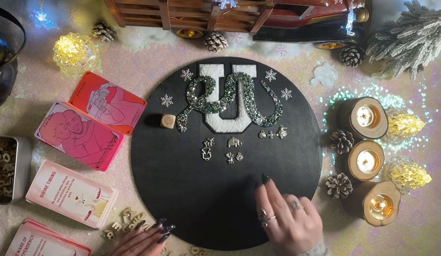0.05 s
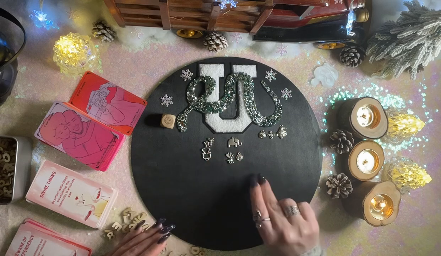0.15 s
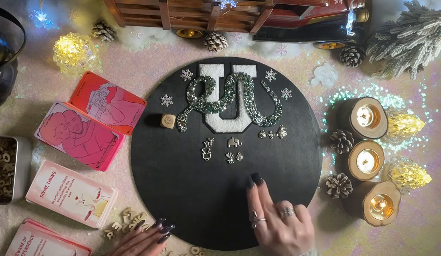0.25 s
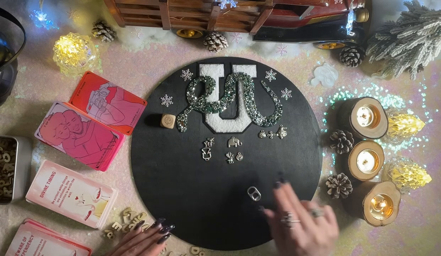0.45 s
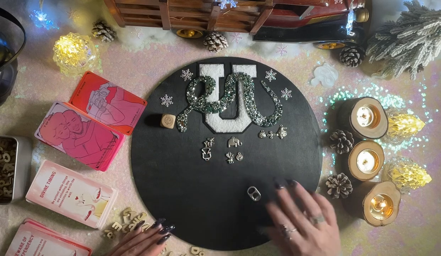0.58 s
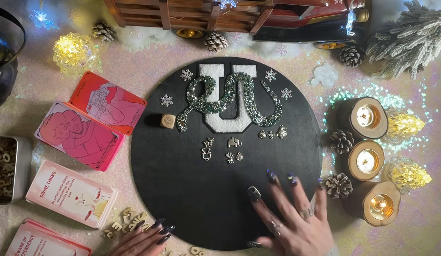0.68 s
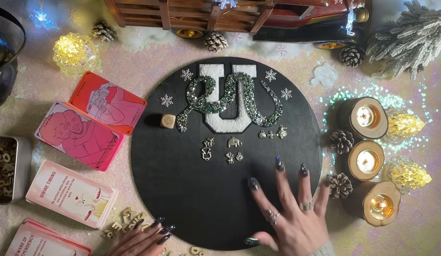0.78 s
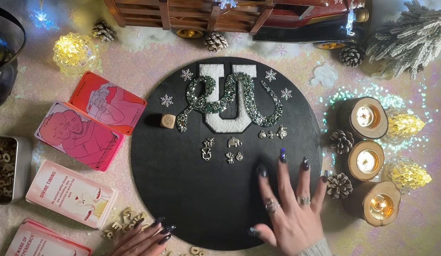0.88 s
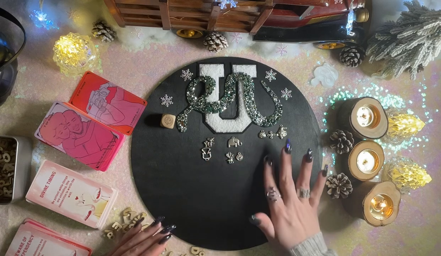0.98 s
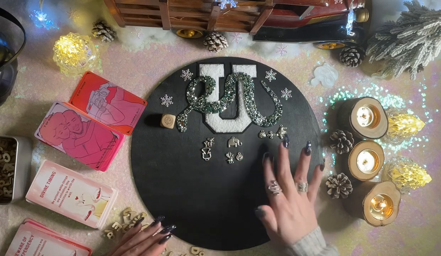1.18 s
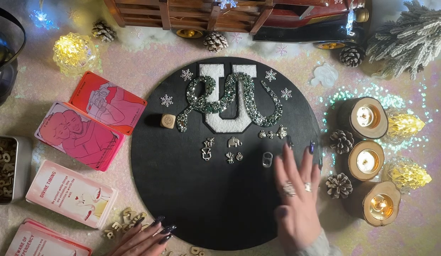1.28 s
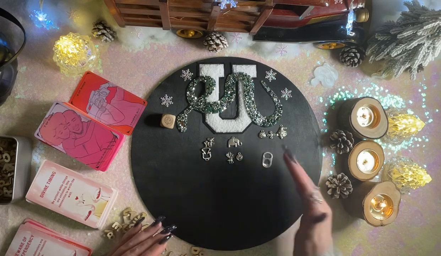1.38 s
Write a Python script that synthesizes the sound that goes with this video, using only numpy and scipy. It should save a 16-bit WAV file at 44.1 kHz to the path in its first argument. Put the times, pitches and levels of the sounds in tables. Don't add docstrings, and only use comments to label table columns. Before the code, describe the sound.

A small metal pull tab handled on a thin board, heard close in a small room. Faint low hum and hiss until about 0.2 s, then two sharp clacks, a harder slam at 0.31 and quickening bounces to 0.46. Near quiet follows, with a soft swell of rumble around 0.55. From 0.74 to 1.1 a gritty, stuttering finger drag, fading; at 1.21-1.31 a last click and small ticks.

```python
import sys
import numpy as np
from scipy import signal
from scipy.fft import rfft, irfft
from scipy.io import wavfile
from scipy.ndimage import uniform_filter1d

SR = 44100
rng = np.random.default_rng(int(sys.argv[2]) if len(sys.argv) > 2 else 0)


def linear_from_db(decibels):
    return 10 ** (np.asarray(decibels, float) / 20)


def pcm_store(signal):
    levels = np.round(np.clip(np.atleast_2d(signal), -1, 1) * 32767)
    wavfile.write(sys.argv[1], SR, levels.astype(np.int16).T)


N = 63945

# (frequency [Hz], density [dB])
RUMBLE_SPECTRUM = [(30, -48), (60, -15), (160, -9), (200, -13.5), (300, -17.5), (400, -26), (520, -65),
                   (800, -81)]
HISS_SPECTRUM = [(300, -1), (500, 0), (900, -4), (2500, -9), (4000, -12.5), (7500, -16), (9500, -27),
                 (13000, -18), (15500, -16.5)]
# (time [s], frequency [Hz], level [dB])
HUM = [(0.0, 260.7, -62), (0.08, 262.3, -67), (0.27, 262.7, -60.5), (1.296, 250.1, -57.5),
       (1.45, 259.8, -62.5)]
# (frequency [Hz], width [Hz], level [dB])
DRONES = [(60, 18, -66), (101.7, 20, -64), (112.7, 17.3, -58.5), (156.3, 12.5, -60.5)]
# (time [s], level [dB])
SWELL = [(0, -2.5), (.28, -1), (.4, -1), (.55, 5), (.7, -1.5), (.9, -6), (1.1, -3), (1.3, -2), (1.45, -1)]

# (frequency [Hz], gain [dB], t60 [s])
BOARD = [(657, -1, 0.021), (800, 5, 0.014), (1057, 16.5, 0.0053), (1240, 3, 0.008), (1563, 12, 0.0075),
         (1600, 6, 0.0036)]
EDGE = [(1910, 10, 0.0031), (2294, 2, 0.0045), (2534, 3.5, 0.0046), (2950, -4.5, 0.0064), (3360, 6, 0.0038),
        (3710, -2, 0.015), (4330, 1.5, 0.0061), (5200, -1.5, 0.0011)]
TAB = [(5710, -2, 0.0064), (5980, -5.5, 0.0045), (6650, -3.5, .005), (7280, -1.5, .004), (8610, -4.5, .003)]
# (frequency [Hz], gain [dB], t60 [s])
TICK = [(10240, -1, 0.001), (11520, -3, .002), (12550, -3.5, 0.0024), (15100, -13, .002)]
# (frequency [Hz], gain [dB], t60 [s])
HELD_BOARD = [(634, 2, 0.0075), (848, -3, 0.021), (1037.7, -1.5, 0.024), (1265, 0, 0.016),
              (1605, -1.5, 0.007)]
HELD_EDGE = [(1860, -3.5, 0.0044), (2209, 6.5, 0.0074), (2926, -1.5, 0.012), (3450, -3, .007),
             (4120, -5, 0.011)]
HELD_TAB = [(4490, -7.5, 0.004), (6250, -5, .006), (7710, 1, 0.0043), (8490, -0.5, 0.0074)]

# (time [s], level [dB], edge share [dB], tab share [dB])
RATTLE = [(.214, -50, -21, -7), (.3, -58, -3.5, -17), (.33, -71, -6, 7), (.46, -55.5, -1, -5),
          (.5, -69.5, -27, -1), (.58, -89, -13, -26)]
SKID = [(0.736, -49, 2, -30), (0.789, -45.5, -12, -29), (0.861, -69, 11.5, -1)]
BRUSH = [(.645, -96, -1, -3), (.675, -102, -5.5, 7), (.7, -80, -3, 2), (.73, -93, 13, 5)]
DRAG = [(0.729, -59, 1, -15), (0.741, -45.5, -16, -12), (.8, -48, -28, -14), (.85, -43.5, -20.5, -16.5),
        (0.888, -38, -9.5, -18.5), (.96, -46, -7, -15.5), (1.03, -53.5, 0, -13), (1.1, -52.5, -5.5, -21.5),
        (1.2, -62, -11, -18)]
LIFT = [(1.201, -54, -16, -26), (1.235, -63, 3, -26), (1.277, -59.5, 8.5, -18), (1.329, -62.5, -28, -20),
        (1.37, -71, -34.5, -22), (1.45, -68, -20, -43)]

# (time [s], peak [dB], board frequency [Hz], edge gain [dB], edge frequency [Hz])
SLIPS = [(0.815, -30, 1130, -13, 3360), (0.824, -32, 690, -3.5, 3400), (0.844, -32, 773, -18, 1870),
         (0.858, -31, 1130, -22, 1890), (0.867, -31, 1240, -18, 1810), (0.881, -27, 1180, -24, 2100),
         (0.887, -27.5, 860, -23, 1990), (0.893, -25.5, 900, -16, 2290), (0.904, -24, 1220, -4, 2260),
         (0.931, -29, 945, -16, 1990), (0.944, -34, 855, -13, 2200), (0.963, -29.5, 1050, -13, 2310),
         (0.968, -25, 1270, -3, 2210), (0.989, -31, 1390, -14, 2090), (1.019, -38, 1000, -9, 2170),
         (1.051, -44, 840, -20, 2110), (1.064, -37, 1320, -12, 2210), (1.236, -43, 1180, -8, 2160),
         (1.246, -31.5, 1080, -11, 2160), (1.267, -37, 1260, -12, 2220), (1.28, -38, 1300, -17, 2260)]
SQUEAKS = [(.257, -30.5, 1300, 4, 2020), (0.81, -39, 1200, -3, 2900), (0.79, -24, 1070, 2, 2330),
           (0.91, -42, 1100, 3, 2200), (1.275, -37, 940, 6, 2450)]

# (time [s], peak [dB])
BLOWS = [
    (0.2146, -20),
    (0.2279, -17.5),
    (0.3146, -14),
    (1.2165, -22),
]
# (time [s], peak [dB])
BOUNCES = [(.3448, -26), (.3735, -20.5), (.4105, -23)]
# (frequency [Hz], gain [dB], t60 [s])
FIRST_SPOT = [(720, -1, 0.0074), (1082, 3, 0.011), (1490, -2.5, 0.0046), (2300, 0, 0.0056),
              (4300, -17, .005)]
SECOND_SPOT = [(1004, -4.5, 0.01), (1620, -2, 0.0073), (2390, -5, .005), (3570, -0.5, .007),
               (4370, -7, .006), (5490, 3, .011), (6940, -1.5, .008)]
SLAM_SPOT = [(634, -3, 0.0088), (790, 0.5, 0.014), (1116, 0, 0.0083), (1640, -2, 0.015), (1990, -1, 0.0082),
             (2420, -1, 0.0057), (2780, -5.5, 0.0098), (3310, -2.5, .007), (3760, -1, .007),
             (4500, 4, .007)]
LAST_SPOT = [(1000, 1.5, 0.0068), (1270, 1, 0.01), (1880, -23, .005), (3080, 0.5, .006), (7460, 1.5, .005),
             (8250, 4.5, .005)]

# (time [s], peak [dB], board share [dB], edge share [dB], tab share [dB])
DROPS = [(0.214, -14.5, -24, -18, -33), (0.227, -17, -28, -17, -14), (0.253, -20.5, -16, -17.5, -24.5),
         (0.314, -10, -49, -23.5, -18.5), (0.3445, -28.5, -25, -24, -9.5), (0.359, -29.5, -8, -8.5, -12),
         (0.373, -18, -16.5, -15, -19.5), (0.41, -25, -13, -8.5, -10), (0.426, -35, -19, -4.5, -6.5),
         (0.436, -25.5, -13.5, -7, -9.5), (0.442, -30, -5.5, -10, -21), (0.452, -30, -8, -13, -9.5),
         (0.463, -34.5, -8, -7.5, -12)]
CATCHES = [(0.576, -58, -4, -10, -25), (0.613, -52, 0, -15.5, -30.5), (0.655, -55, -10, -17, -6.5),
           (0.67, -57, -36, -38, -1), (0.737, -27, -13.5, -17.5, -10.5), (0.923, -26.5, -7, -11, -33),
           (0.968, -23.5, -11.5, -11.5, -30), (1.007, -29.5, -5, -10, -29), (1.088, -37, -4, -6, -54),
           (1.212, -28.5, -13.5, -7, -33), (1.243, -33, -13, -6.5, -12.5), (1.25, -25.5, -8, -9, -15),
           (1.2615, -37.5, -14, -9, -6), (1.275, -29.5, -10, -11, -15.5), (1.3, -34, -11.5, -11, -16.5),
           (1.309, -39.5, -7, -7.5, -13.5)]
MORE_CATCH_S = [.3712, .9118, .9487, 1.134, 1.1853, 1.2155, 1.2215]
# (peak [dB], board share [dB], edge share [dB], tab share [dB])
MORE_CATCHES = [(-24.5, -13, -7, -11), (-27, -4, -9.5, -33), (-34, -10, -7.5, -28), (-60.5, -20, -9, 0.5),
                (-41, -28, -0.5, -18.5), (-21, -23.5, -25, -15), (-36.5, -13, -12, -4.5)]
CHATTER_DB = [-24, -10.5, 7, -7]


def unit(x):
    return x / np.sqrt(np.mean(x ** 2) + 1e-30)


def walk(rate_hz):
    hold = max(int(SR / rate_hz), 2)
    steps = np.repeat(rng.standard_normal(N // hold + 1), hold)
    return 0.8 * uniform_filter1d(uniform_filter1d(steps, hold), hold)[:N]


def high_pass(x, order, cut_hz):
    return signal.sosfilt(signal.butter(order, cut_hz, "high", fs=SR, output="sos"), x)


def coloured(spectrum):
    hz = np.maximum(np.fft.rfftfreq(N, 1 / SR), 1)
    point_hz, point_db = np.array(spectrum).T
    gain = linear_from_db(np.interp(np.log(hz), np.log(point_hz), point_db))
    return unit(irfft(rfft(rng.standard_normal(N)) * gain, N))


def hum():
    t = np.arange(N) / SR
    time_s, hz, db = np.array(HUM).T
    phase = 2 * np.pi * np.cumsum(np.interp(t, time_s, hz)) / SR
    level_db = np.interp(t, time_s, db) + 2.0 * walk(8.46)
    return np.sqrt(2) * linear_from_db(level_db) * np.sin(phase)


def drone(hz, width_hz):
    b, a = signal.iirpeak(hz, hz / width_hz, SR)
    once = signal.lfilter(b, a, rng.standard_normal(2 * N))
    return unit(signal.lfilter(b, a, once)[N:])


def background():
    rumble_db, hiss_db = -60, -75
    swell = linear_from_db(np.interp(np.arange(N) / SR, *np.array(SWELL).T))
    drones = sum(linear_from_db(db) * drone(hz, width_hz) for hz, width_hz, db in DRONES)
    rumble = linear_from_db(rumble_db) * coloured(RUMBLE_SPECTRUM)
    return hum() + swell * (drones + rumble) + linear_from_db(hiss_db) * coloured(HISS_SPECTRUM)


def room(x):
    level_db, gap_s, split_hz = -8.5, 0.0017, 6300
    t60_s, dull_t60_s = 0.15, 0.19
    t = np.arange(SR // 3) / SR
    full, other = rng.standard_normal((2, len(t))) * (1 - np.exp(-(t / gap_s) ** 2))
    dull = signal.sosfilt(signal.butter(4, split_hz, fs=SR, output="sos"), other)
    tail = full * linear_from_db(-60 * t / t60_s) + 0.6 * dull * linear_from_db(-60 * t / dull_t60_s)
    return linear_from_db(level_db) * signal.fftconvolve(x, tail / np.sqrt(np.sum(tail ** 2)))[:N]


def ring(modes, push_cycles=0.36, chance=np.zeros((2, 16))):
    detune, scatter_db, max_cycles = 0.02, 1.5, 22
    table, t = np.array(modes), np.arange(1024) / SR
    count = len(table)
    hz = table[:, :1] * (1 + detune * chance[0, :count, None])
    gain = linear_from_db(table[:, 1] + scatter_db * chance[1, :count]) * (-1.0) ** np.arange(count)
    t60_s = np.minimum(table[:, 2:], max_cycles / hz)
    push = (1 - np.exp(-t * hz / push_cycles)) ** 2
    decay = np.exp(-np.log(1000) * t / t60_s)
    y = gain @ (push * decay * np.sin(2 * np.pi * hz * t))
    return y / np.sqrt(np.sum(y ** 2))


def scrape(curve, bodies):
    grit_per_s, scatter_db = 2200, 1.5
    stick_db, stick_hz = 1.5, 83
    t, time_s = np.arange(N) / SR, np.array(curve)[:, 0]
    db, edge_db, tab_db = (np.interp(t, time_s, column) for column in np.array(curve)[:, 1:].T)
    tick_db = tab_db - 7 + 0.61 * (db + tab_db + 57.5)
    touching = (t > time_s[0]) * (t < time_s[-1])
    press = touching * linear_from_db(db + stick_db * walk(stick_hz))
    out = np.zeros(N)
    for body, density, share_db in zip(bodies, (1, 2, 6.7, 23), (0, edge_db, tab_db, tick_db)):
        grain_db = scatter_db * np.minimum(rng.exponential(size=N), 3)
        hits = rng.random(N) < density * grit_per_s / SR
        grit = unit(hits * linear_from_db(grain_db) * rng.standard_normal(N))
        out += signal.fftconvolve(grit * press * linear_from_db(share_db), ring(body))[:N]
    return out


def strike(hits):
    out = np.zeros(N + 1024)
    for s, db, modes in hits:
        y, i = ring(modes, push_cycles=0.14), int(s * SR)
        out[i:i + len(y)] += linear_from_db(db) * y / np.max(np.abs(y))
    return out[:N]


def slips():
    level_db, board_t60_s, edge_t60_s = -5.5, 0.029, 0.014
    hits = []
    for s, db, board_hz, edge_db, edge_hz in SLIPS + SQUEAKS:
        modes = [(board_hz, 0, board_t60_s), (edge_hz, edge_db, edge_t60_s)]
        hits.append((s, db + level_db, modes))
    return strike(hits)


def charm():
    start_s, hz, level_db, t60_s = 0.438, 6735, -57, 0.13
    t = np.maximum(np.arange(N) / SR - start_s, 0)
    return linear_from_db(level_db - 60 * t / t60_s) * np.sin(2 * np.pi * hz * t)


def blows():
    spots = (FIRST_SPOT, SECOND_SPOT, SLAM_SPOT, LAST_SPOT)
    hits = [(s, db, spot) for (s, db), spot in zip(BLOWS, spots)]
    return strike(hits + [(s, db, SLAM_SPOT) for s, db in BOUNCES])


def knocks(table, bodies):
    level_db, chatter_s, travel_s = -4, 0.0023, 0.0006
    out, t = np.zeros(N + 4096), np.arange(256) / SR
    for s, db, board_db, edge_db, tab_db in table:
        contact = linear_from_db(CHATTER_DB)[:, None] * rng.standard_normal((4, 256)) * np.exp(-t / chatter_s)
        contact[:, 0] += 1
        spot = rng.standard_normal((4, 2, 16))
        i = int((s + travel_s) * SR)
        tick_db = tab_db - 4 + 0.28 * (db + tab_db + 34)
        shares_db = (board_db, edge_db, tab_db, tick_db)
        for body, chance, hit, share_db in zip(bodies, spot, contact, shares_db):
            y = np.convolve(hit, ring(body, chance=chance))
            out[i:i + len(y)] += linear_from_db(db + share_db + level_db) * 10 * y / np.sqrt(np.sum(y ** 2))
    return out[:N]


def scene():
    echo_s, echo_db = 0.006, -17
    free = (BOARD, EDGE, TAB, TICK)
    held = (HELD_BOARD, HELD_EDGE, HELD_TAB, TICK)
    more_catches = [(s, *strength) for s, strength in zip(MORE_CATCH_S, MORE_CATCHES)]
    tab = knocks(DROPS, free) + knocks(CATCHES + more_catches, held)
    tab = tab + charm() + blows() + slips()
    tab = tab + sum(scrape(curve, free) for curve in (RATTLE, SKID))
    tab = tab + sum(scrape(curve, held) for curve in (BRUSH, DRAG, LIFT))
    tab = tab + linear_from_db(echo_db) * np.roll(tab, int(echo_s * SR))
    tab = high_pass(tab + room(tab), 5, 514)
    return (tab + high_pass(background(), 4, 45))[None]


def low_pass(x):
    return signal.sosfilt(signal.butter(12, 16610, fs=SR, output="sos"), x)


def record(dry):
    top_hz = 15800
    mix = signal.sosfilt(signal.ellip(6, 0.3, 40, top_hz, fs=SR, output="sos"), dry)
    return low_pass(mix)


dry = scene()
out = record(dry)
pcm_store(out)
```